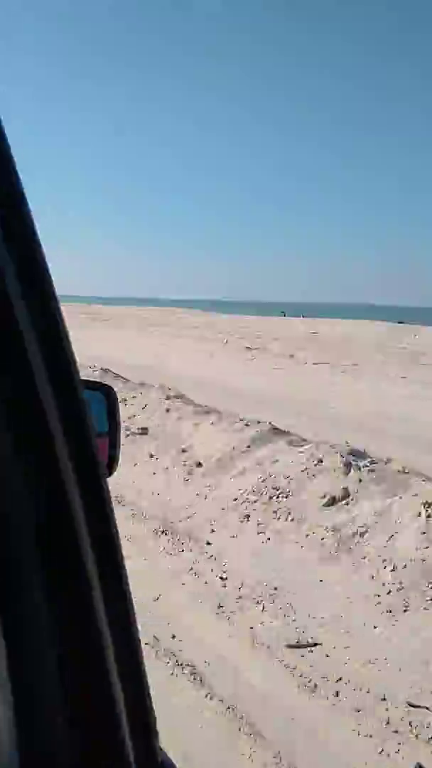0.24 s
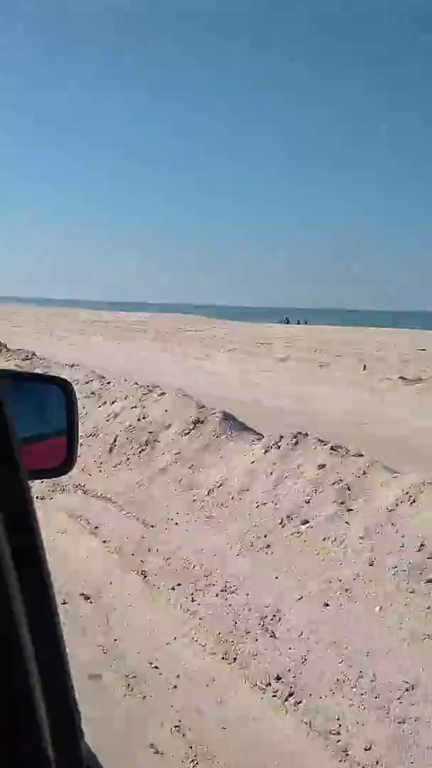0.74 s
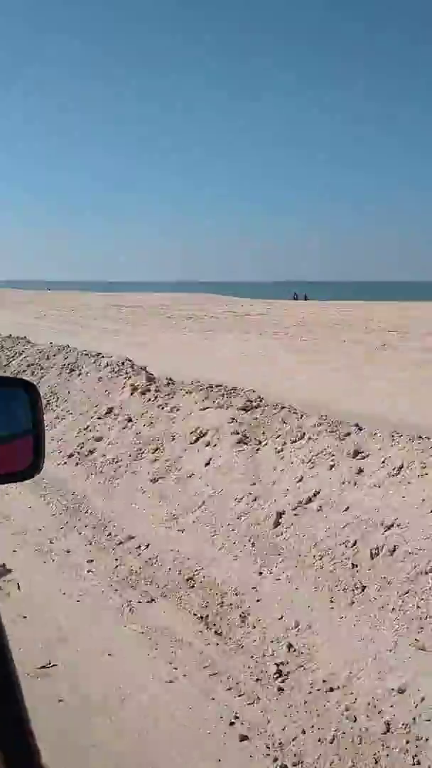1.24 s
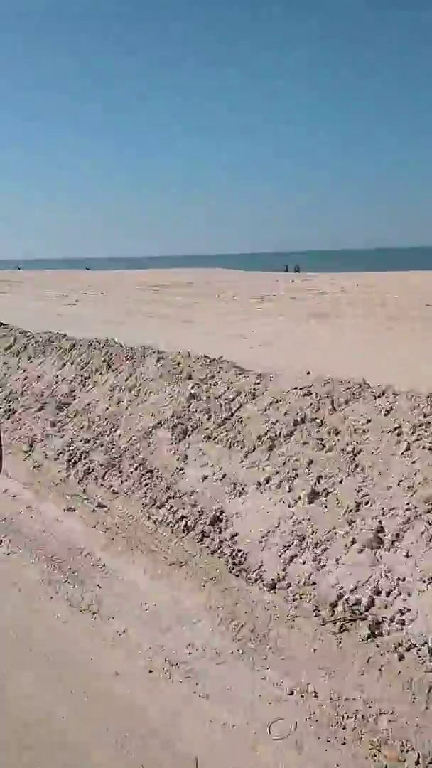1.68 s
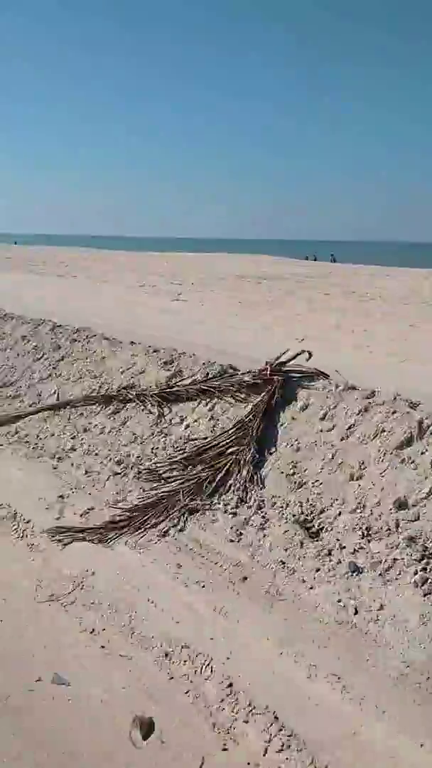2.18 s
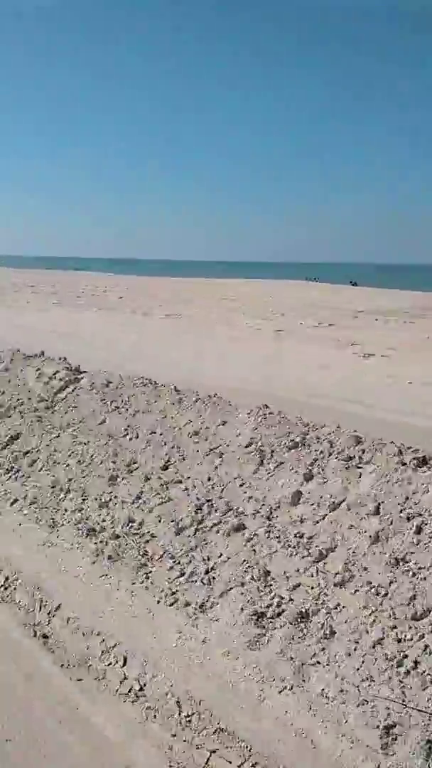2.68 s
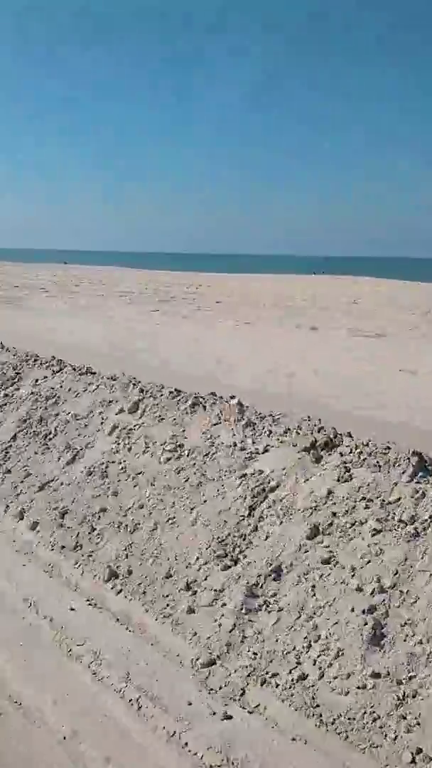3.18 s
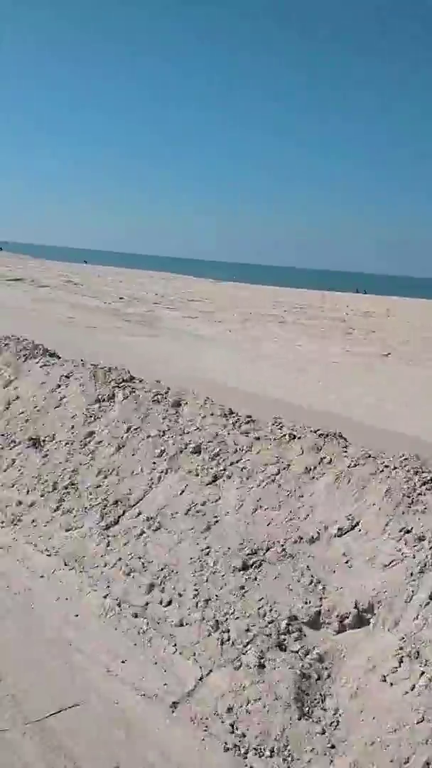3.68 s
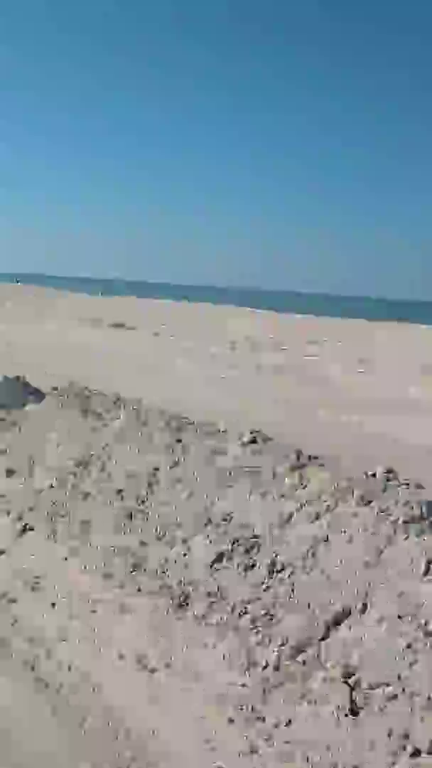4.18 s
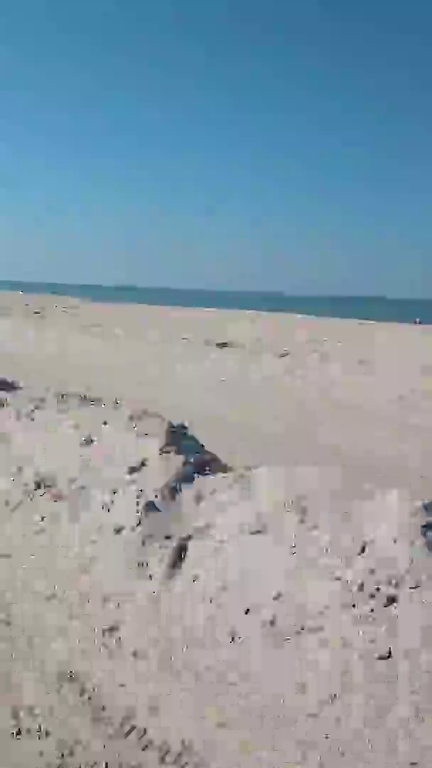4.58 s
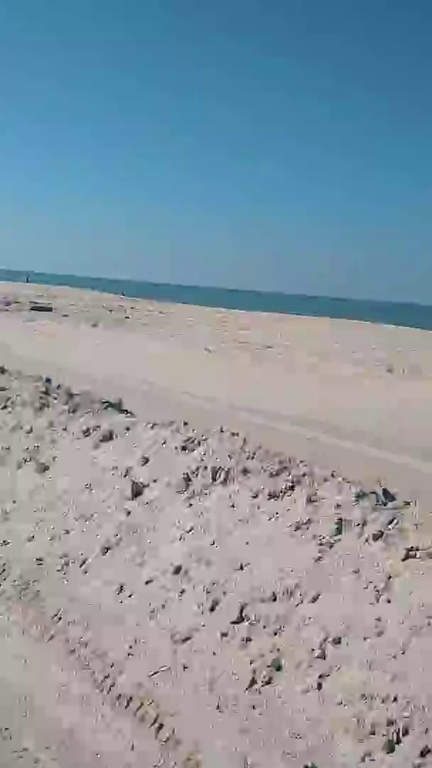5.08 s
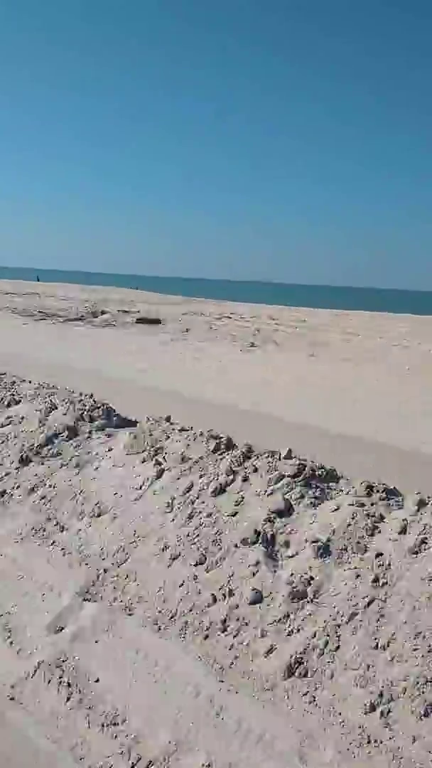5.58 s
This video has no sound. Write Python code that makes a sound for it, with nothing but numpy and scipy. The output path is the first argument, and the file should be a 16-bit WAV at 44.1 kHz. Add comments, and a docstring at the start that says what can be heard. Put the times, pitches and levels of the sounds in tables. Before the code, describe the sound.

Heard from a phone inside a car on a sandy track: low road rumble, a thin hissing rush, dull thumps and spurts of sand. A gust hits at about half a second, the car sound drops away, and by one and a half seconds violent wind batters the microphone, continuing to the end with knocks, short lulls and sharp crackling spikes.

```python
"""A phone with two microphone ports is held at the side window of a car driving along a sandy track.
At first tyres and sand are heard as coloured noise, with dull thumps (brief low tones that swell and
fade evenly) and hissing scuffs. A first gust comes at the edge of the window; then the airstream builds
and eddies batter the ports: noise that follows the flow, with knocks at eddy fronts and sharp spikes.
Each port is subtracted from the other to widen the stereo, so the buffeting is out of phase in the bass."""
import sys
import numpy as np
from scipy import signal
from scipy.fft import rfft, irfft
from scipy.io import wavfile
from scipy.ndimage import uniform_filter1d, minimum_filter1d

SR = 44100
rng = np.random.default_rng(int(sys.argv[2]) if len(sys.argv) > 2 else 0)


def master_out(mix):
    """Clip the mix to full scale and print it as 16-bit PCM to the path in sys.argv[1]."""
    frames = np.transpose(np.atleast_2d(mix))
    ceiling = np.clip(frames, -1, 1)
    pcm = np.round(ceiling * 32767).astype(np.int16)
    wavfile.write(sys.argv[1], SR, pcm)


N = 257544
TIME = np.arange(N) / SR  # s
FREQ = np.maximum(np.arange(N // 2 + 1) * SR / N, 1)  # Hz

# The car falls in level in two steps as the phone moves out: (time [s], length of the step [s])
MOVES = [(.555, 0.034), (1.42, 0.22)]
# Lift of each sound over its colour: inside the window, at its edge, out in the airstream [dB]
RUMBLE_DB, SPRAY_DB = (2, -9, -15.5), (-16.5, -21, -24.5)
RUSH_DB = (1.5, -9, -27)
# Road rumble, nearly alike on both ports: (frequency [Hz], density [dB per Hz])
RUMBLE_COLOUR = [(25, -76), (60, -46), (140, -42), (260, -48.5), (450, -63.5), (700, -65), (950, -74),
                 (1300, -97), (2100, -112), (6000, -135)]
# Rush on the right port, at first of the tyres: (frequency [Hz], density [dB per Hz])
RUSH_COLOUR = [(1200, -105), (1800, -100), (2130, -88.5), (2330, -70.5), (2700, -71), (3300, -80),
               (3900, -89), (5200, -103), (6500, -111), (9000, -122), (15000, -130)]
# Hiss on the right port swells for a while: (time [s], lift [dB], length [s])
HISS_SWELLS = [(1.28, 5, 0.49), (3.0, 15.5, 0.6)]
# The tyres spurt through loose sand while the phone is still inside: (time [s], lift [dB])
SPURTS = [(.088, 12), (.215, 9.5), (.254, 9.5), (.312, 4), (0.327, 7), (.373, -4), (.4, 0), (.434, 4.5),
          (.465, 0), (.498, -2), (.528, 5)]
SPURT_S = 0.0053
# Sand spray: (frequency [Hz], density [dB per Hz])
SAND_COLOUR = [(2500, -120), (4500, -80.5), (5800, -97), (6700, -105), (7350, -92), (8200, -108),
               (10500, -99), (12500, -90.5), (15000, -90.5)]
# The tyres throw up more sand: (time [s], lift [dB], length [s])
SAND_BURSTS = [(.16, 16, 0.27), (0.528, 12, 0.053), (5.84, 18.5, 0.16)]
# Air rushing past the window frame, over its colour: (time [s], level [dB])
FRAME_AIR = [(0, -24), (.14, 1.5), (.25, -27), (.36, -4.5), (.6, -6), (.88, -4), (1.0, 5), (1.12, 4),
             (1.5, -8.5)]
# Colour of the air on the frame: (frequency [Hz], density [dB per Hz])
FRAME_AIR_COLOUR = [(300, -85), (800, -70.5), (1300, -81), (1650, -90.5), (1950, -107), (2500, -86),
                    (5000, -122)]
# Dull thumps as the car rides over ruts: (time [s], peak [dB], pitch [Hz], length [s])
THUMPS = [(.068, -7, 149, 0.0048), (.16, -7.5, 172, 0.01), (.559, -14, 227, 0.012), (1.353, -9, 175, 0.01)]
# Brief hissing scuffs: (time [s], level [dB], length [s], centre [Hz], width [log of frequency ratio])
SCUFFS = [(0.33, -50.5, 0.08, 4260, 0.12), (0.373, -55, 0.062, 1690, 0.12),
          (0.523, -58.5, .034, 7200, 0.58), (.69, -70, .03, 7300, 0.61), (1.0, -53, 0.03, 4600, 0.38),
          (1.195, -62.5, 0.22, 4350, 0.1), (1.36, -68, .012, 6000, 0.71), (1.393, -56, 0.015, 4700, 0.34),
          (1.394, -59, .02, 13000, 0.38)]
SCUFF_GRAIN_DB = 3

# Airstream strength, building as the phone leaves shelter, then swelling and easing: (time [s], level [dB])
FLOW = [(0, -38), (.26, -38), (.35, -32), (.45, -40.5), (.52, -40), (.85, -43.5), (1.0, -32.5), (1.22, -34),
        (1.42, -30), (1.58, -29), (1.76, -25), (1.9, -22.5), (2.03, -23), (2.15, -19.5), (2.55, -19.5),
        (2.95, -19), (3.3, -15), (3.63, -22), (4.4, -21), (4.52, -24), (4.72, -19), (4.92, -24),
        (5.3, -17.5), (5.84, -19)]
CRUISE_DB = -20  # level of cruising flow in that table
# The first gust, as the phone reaches the edge of the window: (time [s], lift [dB], length [s])
FIRST_GUST = (.555, 24, 0.024)
# The largest eddies that hit the phone: (time [s], lift over the airstream [dB], length [s])
BUFFETS = [(1.043, 10.0, 0.01), (1.124, 10.0, 0.05), (1.277, 6.0, 0.041), (1.35, 15.5, 0.01),
           (1.408, 12.0, 0.019), (1.427, 8, 0.007), (1.46, 14, 0.011), (1.526, 14, 0.011),
           (1.54, 13.5, 0.019), (1.603, 10, 0.018), (1.669, 14, 0.027), (1.724, 7.5, 0.022),
           (1.764, 8.0, 0.006), (1.798, 11, 0.012), (1.858, 14, 0.008), (1.876, 8, 0.005),
           (1.894, 12, 0.021), (1.948, 9, 0.006), (1.958, 13, 0.022), (2.103, 5.5, 0.01),
           (2.134, 9.0, 0.009), (2.173, 6.5, 0.006), (2.19, 8.0, 0.013), (2.228, 5.0, 0.01),
           (2.281, 10.5, 0.007), (2.332, 5.0, 0.029), (2.386, 10.5, 0.008), (2.408, 8.5, 0.027),
           (2.484, 7, 0.007), (2.579, 8.5, 0.012), (2.621, 8.5, 0.007), (2.636, 8.5, 0.007),
           (2.699, 11.5, 0.008), (2.718, 7.0, 0.009), (2.775, 7.0, 0.012), (2.824, 10.0, 0.006),
           (2.847, 7.0, 0.008), (2.999, 9.5, 0.008), (3.125, 7.5, 0.009), (3.198, 4.5, 0.016),
           (3.238, 7, 0.006), (3.302, 8.0, 0.007), (3.344, 5.5, 0.009), (3.46, 5.0, 0.049),
           (3.501, 8.0, 0.013), (3.559, 7.0, 0.026), (3.688, 8.5, 0.005), (3.769, 9.0, 0.033),
           (3.805, 7.0, 0.009), (3.902, 7.5, 0.006), (3.913, 5.0, 0.038), (3.953, 6.5, 0.034),
           (4.01, 9, 0.007), (4.047, 10, 0.009), (4.102, 8.0, 0.013), (4.146, 6.5, 0.046),
           (4.183, 9, 0.008), (4.206, 7, 0.007), (4.354, 6.0, 0.033), (4.411, 7.5, 0.017),
           (4.453, 9.0, 0.019), (4.504, 8.0, 0.006), (4.531, 7, 0.007), (4.573, 9, 0.006),
           (4.701, 6.5, 0.007), (4.734, 10.5, 0.01), (4.755, 7.5, 0.006), (4.834, 7.5, 0.032),
           (4.969, 11.5, 0.009), (4.991, 8.0, 0.006), (5.105, 4.5, 0.024), (5.124, 6.5, 0.009),
           (5.227, 5.0, 0.019), (5.252, 6.5, 0.011), (5.358, 5.5, 0.015), (5.372, 10.5, 0.009),
           (5.409, 8.5, 0.008), (5.467, 6.5, 0.015), (5.526, 8.0, 0.006), (5.569, 7.5, 0.013),
           (5.618, 9, 0.018), (5.673, 8.5, 0.007), (5.707, 6.0, 0.016), (5.737, 10, 0.007),
           (5.767, 7.0, 0.02)]
EDDY_RISE_S = 0.0014
STRONGEST_EDDY_DB = 8.5  # soft ceiling of the flow over cruising
# Brief lulls as the stream lifts off the ports: (time [s], change [dB], length [s])
LULLS = [(1.492, -8, 0.01), (1.514, -7, 0.0067), (1.58, -20, 0.024), (1.714, -7.5, 0.008),
         (1.927, -10.5, 0.016), (3.893, -5, 0.0079), (4.197, -18, 0.012), (4.255, -13, 0.011),
         (5.141, -8.5, 0.006)]
STRAY_EDDIES_PER_S, STRAY_FALL_S, STRAY_DB = 170, 0.0036, 1.49  # the lesser eddies between the large
FLUTTER_HZ, FLUTTER_DB = 67.6, 1.5
# Wind pressure at cruising flow, before the exposure of each port: (frequency [Hz], density [dB per Hz])
WIND_COLOUR = [(25, -65.5), (42, -76), (75, -48), (115, -38), (160, -37.5), (250, -42.5), (450, -50),
               (800, -59), (1400, -73), (2200, -85.5), (3200, -98.5), (4500, -105), (7000, -122),
               (15000, -138)]
# How bands follow the flow: (frequency [Hz], follow [dB per dB of flow],
# depth of fine turbulence [dB], rise on a pressure crest [dB])
RESPONSE = [(81, 0.88, 1.5, 0), (228, 0.92, 0.46, 0.5), (710, 0.91, 4, 1.16), (1570, 0.9, 4, 3.5),
            (2950, 0.85, 5, 3.5), (7000, 0.46, 3, 0.5)]
DULL_ABOVE_HZ, DULL_PER_OCTAVE = 1200, 0.81  # slow eddies lose treble: dB per octave per dB under cruising
# Which port faces the stream as the phone turns in the hand: (time [s], left over right [dB])
FACING = [(0, 0.5), (1.25, -5), (1.5, 14.5), (2.35, 6.5), (2.88, -14), (3.15, -4.5), (3.35, 4.5), (5.84, 3)]
FACING_GROWS = 0.021  # a large eddy is more one-sided: share per dB of its lift
PORTS_DB = 0.42  # gain of the turbulence on both ports
# Slow swirl behind the window frame, over its colour; the last level holds: (time [s], level [dB])
SWIRL = [(0, -7), (.12, -1), (.25, -17), (.4, -2), (.65, -23), (.95, -14), (1.14, 0.5), (1.25, 5.5),
         (1.4, 11.5), (1.85, 2.5)]
# Colour of the slow swirl: (frequency [Hz], density [dB per Hz])
SWIRL_COLOUR = [(25, -63.5), (42, -67.5), (70, -49.5), (140, -47), (230, -53.5), (400, -67), (800, -88.5),
                (2000, -130)]
SWIRL_FOLLOW = 0.49  # dB of slow swirl per dB of a large eddy
# Pressure spikes as a vortex breaks on the left port, before gain and colour: (time [s], level [dB])
SPIKES = [(1.4627, -48.5), (1.67, -40), (1.6808, -34.5), (1.859, -48), (1.959, -53), (1.9709, -34.5),
          (1.9875, -45), (2.157, -62), (2.175, -45.5), (2.346, -42.5), (2.361, -49), (2.4302, -34),
          (2.696, -51), (2.717, -42), (3.0595, -43), (3.214, -38), (3.264, -41.5), (3.3021, -35),
          (3.329, -42), (3.3423, -33.5), (3.351, -38), (3.3678, -41.5), (3.3862, -41.5), (3.461, -42.5),
          (3.5791, -39.5), (3.688, -43), (3.9618, -44), (4.4138, -35), (4.42, -40), (4.4622, -41.5),
          (4.496, -42.5), (4.5753, -41.5), (4.734, -40), (4.851, -40), (5.126, -42), (5.3644, -50),
          (5.376, -35.5), (5.467, -30.5), (5.54, -39), (5.6196, -33), (5.6266, -45), (5.7678, -42.5)]
# Colour of a spike: (frequency [Hz], gain [dB])
SPIKE_COLOUR = [(40, 29.5), (150, 38), (600, 50.5), (1400, 46.5), (2500, 33.5), (4000, 23.5), (7000, 1),
                (15000, -15)]
# Knock of a steep eddy front on a port, at cruising flow: (frequency [Hz], gain [dB])
KNOCK_COLOUR = [(40, -7), (130, 16.5), (500, 11), (1200, 3.5), (1800, -10), (2600, -21), (4000, -37.5),
                (8000, -56.5)]
KNOCK_LATE_S, KNOCK_FOLLOW = 0.001983, 0.55  # delay after the front arrives; dB per dB of flow
KNOCK_PER_LIFT, USUAL_LIFT_DB = 0.28, 11  # an eddy that stands out has a steeper front: dB per dB of lift

OVERLOAD_DB = 0  # pressure at which the microphones flatten out
WIDEN_SHARE, WIDEN_LAG_S = 0.77, 0.000459
TOP_HZ = 15600


def undb(db):
    """Logarithmic level: decibels become an amplitude ratio."""
    return 10 ** (np.asarray(db) / 20)


def curves(table):
    """Linear interpolation: each column of a timed table, joined by straight lines."""
    s, *columns = np.transpose(table)
    return [np.interp(TIME, s, c) for c in columns]


def white():
    """White noise: equal power in every band, one unit per Hz."""
    return rng.standard_normal(N) * np.sqrt(SR / 2)


def colour(x, points):
    """Minimum-phase filtering: a causal response with its gain through (Hz, dB) points."""
    hz, db = np.transpose(points)
    log_gain = np.log(undb(np.interp(np.log(FREQ), np.log(hz), db)))
    # folding the cepstrum onto positive time makes the response causal
    cepstrum = irfft(log_gain, N)
    cepstrum[1:N // 2] *= 2
    cepstrum[N // 2 + 1:] = 0
    response = irfft(np.exp(rfft(cepstrum)), N)[:SR // 10]
    return signal.fftconvolve(x, response)[:N]


def delay(x, lag_s):
    """Pure delay: both channels start later by a whole number of samples."""
    return np.pad(x, ((0, 0), (round(lag_s * SR), 0)))[:, :N]


def walk(rate_hz):
    """Low-passed random fluctuation: spread 1, moving up to about the given rate."""
    spectrum = rfft(rng.standard_normal(N)) * np.exp(-(FREQ / rate_hz) ** 2)
    x = irfft(spectrum, N)
    return x / x.std()


def swell(s, length):
    """Gaussian envelope: a bell-shaped rise and fall around one moment."""
    return np.exp(-2 * ((TIME - s) / length) ** 2)


def lifts(table):
    """Superposition of Gaussian envelopes: lift in dB from a table of swells."""
    return sum(lift_db * swell(s, length) for s, lift_db, length in table)


def sheltered(inside_db, edge_db, outside_db):
    """Shelter of the window: level in dB as the phone moves from inside to its edge and then out."""
    to_edge, to_outside = (np.clip((TIME - s) / length + .5, 0, 1) for s, length in MOVES)
    return inside_db + (edge_db - inside_db) * to_edge + (outside_db - edge_db) * to_outside


def road():
    """Modulated broadband noise: road rumble, air on the frame, a grainy rush and sand spray."""
    rumble_db = sheltered(*RUMBLE_DB)
    rumble = colour(white() * undb(rumble_db + 2 * walk(6.5)), RUMBLE_COLOUR)

    air_db = curves(FRAME_AIR)[0]
    air = colour(white() * undb(air_db + 1.3 * walk(30)), FRAME_AIR_COLOUR)

    spurts_db = lifts((s, db, SPURT_S) for s, db in SPURTS)
    rush_db = sheltered(*RUSH_DB) + lifts(HISS_SWELLS) + spurts_db
    rush = colour(white() * undb(rush_db + 1.6 * walk(50) + 1.4 * walk(400)), RUSH_COLOUR)

    spray_db = sheltered(*SPRAY_DB) + lifts(SAND_BURSTS)
    # independent noise on each port
    left_spray, right_spray = (colour(white() * undb(spray_db + walk(200)), SAND_COLOUR) for _ in range(2))

    left = rumble + air + left_spray
    right = undb(-0.5) * (rumble + air) + rush + undb(-4.5) * right_spray
    return np.array([left, right])


def thumps():
    """Gaussian tone bursts: brief low tones that swell and fade evenly, the same on both ports."""
    return sum(undb(db) * swell(s, length) * np.sin(2 * np.pi * hz * (TIME - s))
               for s, db, hz, length in THUMPS)


def scuffs():
    """Band-limited noise: short grainy hisses, each with its own brightness."""
    out = 0
    for s, db, length, hz, width in SCUFFS:
        band = np.exp(-(np.log(FREQ / hz) / width) ** 2)
        hiss = irfft(rfft(rng.standard_normal((2, N))) * band, N)
        out = out + hiss / hiss.std() * undb(db) * swell(s, length)
    return out * undb(SCUFF_GRAIN_DB * walk(250))


def slap(s, length, rise_s):
    """Transient envelope: the steep front of an eddy, a short hold and a quick fall."""
    age = TIME - s
    spent = np.clip(age / length, 0, 2)
    front = np.clip(age / rise_s + 1, 0, 1)
    return front * np.exp(-spent * spent * spent) * (spent < 2)


def buffets():
    """Large-scale turbulence: lift in dB from the first gust and the large eddies."""
    return sum(lift_db * slap(s, length, EDDY_RISE_S) for s, lift_db, length in [FIRST_GUST, *BUFFETS])


def small_eddies(rate, fall_s):
    """Shot noise: random impacts of very unequal strength, dying away; mean 0, spread 1."""
    impacts = (rng.random(N) < rate / SR) * rng.exponential(size=N)
    decaying = signal.lfilter([1], [1, -np.exp(-1 / (fall_s * SR))], impacts)
    x = uniform_filter1d(decaying, size=24)
    return (x - x.mean()) / x.std()


def airstream(buffet_db):
    """Turbulent flow in dB over cruising: steady stream, large and lesser eddies, lulls and flutter."""
    stray = np.tanh(small_eddies(STRAY_EDDIES_PER_S, STRAY_FALL_S))
    stray = stray - uniform_filter1d(stray, size=2200)  # removes the slow drift
    stray_db = STRAY_DB * stray / stray.std()
    steady_db = curves(FLOW)[0] - CRUISE_DB
    flow_db = steady_db + buffet_db + lifts(LULLS) + stray_db + FLUTTER_DB * walk(FLUTTER_HZ)
    # no eddy is much faster than the stream that drives it
    return flow_db - 2 * np.logaddexp(0, (flow_db - STRONGEST_EDDY_DB) / 2)


def port(flow_db):
    """Turbulent pressure on a port: faster flow is brighter; small eddies crackle on large crests."""
    hz, follow, depth_db, crest_db = np.transpose(RESPONSE)
    noise = rfft(white())
    bursts = 2.86 * np.tanh(small_eddies(rate=500, fall_s=0.0012) / 2.0)
    swing = colour(irfft(noise, N), WIND_COLOUR)
    crests = 2 * np.tanh(np.maximum(swing / swing.std(), 0) ** 2 / 2)
    # how far the flow lies under cruising
    slack_db = np.minimum(curves(FLOW)[0] - CRUISE_DB + buffets() / 2, 0)
    dull = DULL_PER_OCTAVE * np.maximum(np.log2(hz / DULL_ABOVE_HZ), 0)
    pressure = 0
    for k, pick in enumerate(np.eye(len(hz))):
        # overlapping bands that cross-fade along log frequency
        band = irfft(noise * np.interp(np.log(FREQ), np.log(hz), pick), N)
        band = band * undb(depth_db[k] * bursts + crest_db[k] * crests)
        # the bursts share the power that the stream supplies, so it evens out over a few cycles
        power = uniform_filter1d(colour(band, WIND_COLOUR) ** 2, int(SR * (0.015 + 7 / hz[k])))
        even = band * np.sqrt(power.mean() / power)
        pressure = pressure + even * undb(follow[k] * flow_db + dull[k] * slack_db)
    return colour(pressure, WIND_COLOUR)


def spikes(gain_db, ragged, lead_s, tail_s):
    """Impulsive pressure: each breaking vortex is one steep pulse inside a short ragged burst."""
    kicks = np.zeros(N)
    size = SR // 50
    age = np.arange(-size, size) / SR
    envelope = np.exp(np.minimum(age / lead_s, -age / tail_s))
    for s, db in SPIKES:
        pulse = ragged * rng.standard_normal(len(age)) * envelope
        pulse[size] += 1
        start = int(s * SR) - size
        kicks[start:start + len(age)] += undb(db + gain_db) * pulse[:N - start]
    return colour(kicks, SPIKE_COLOUR)


def knocks(flow_db, facing_db):
    """Impulse response of a port: each eddy front pushes or pulls the windward one, harder in fast flow."""
    kicks = np.zeros((2, N))
    pulls = rng.integers(2, size=len(BUFFETS))
    for (s, lift_db, _), pull in zip(BUFFETS, pulls):
        at = int((s + KNOCK_LATE_S) * SR)
        windward = int(facing_db[at] < 0)  # 0 left, 1 right
        knock_db = KNOCK_FOLLOW * flow_db[at] + KNOCK_PER_LIFT * (lift_db - USUAL_LIFT_DB)
        kicks[windward, at] = (-1) ** pull * undb(knock_db)
    return np.array([colour(k, KNOCK_COLOUR) for k in kicks])


def wind():
    """Partial coherence: ports share large eddies, not small; windward is louder, left adds swirl and spikes."""
    buffet_db = buffets()
    flow_db = airstream(buffet_db)
    facing_db = curves(FACING)[0] * (1 + FACING_GROWS * buffet_db)
    # the two exposures split a fixed power
    exposure = undb(PORTS_DB) / np.hypot(1, undb([-facing_db, facing_db]))
    swirl_db = curves(SWIRL)[0] + SWIRL_FOLLOW * buffet_db
    swirl = colour(white() * undb(swirl_db + 0.87 * walk(6.3)), SWIRL_COLOUR)
    left = port(flow_db) * exposure[0] + swirl
    left = left + spikes(gain_db=2.5, ragged=0.058, lead_s=0.0013, tail_s=0.0056)
    right = port(flow_db) * exposure[1]
    return np.array([left, right]) + knocks(flow_db, facing_db)


def scene():
    """Superposition: wind on the ports over the sound of the car."""
    return wind() + road() + thumps() + scuffs()


def widen(ports):
    """Comb filtering: each port less the other delayed, which hollows common sound at 2.2 kHz multiples."""
    return ports - WIDEN_SHARE * delay(ports[::-1], WIDEN_LAG_S)


def record(dry):
    """Saturation, then stereo widening, peak limiting below full scale and a steep low-pass."""
    rounded = dry / (1 + (dry / undb(OVERLOAD_DB)) ** 4) ** (1 / 4)
    wide = widen(rounded)
    headroom = 1 / np.maximum(np.abs(wide).max(axis=0), 1)
    # hold the lowest gain around each peak, then smooth it twice
    held = minimum_filter1d(headroom, size=111)
    gain = uniform_filter1d(uniform_filter1d(held, size=55), size=55)
    low_pass = signal.ellip(10, .2, 80, TOP_HZ, fs=SR, output="sos")
    return signal.sosfilt(low_pass, wide * gain)


dry = scene()
out = record(dry)
master_out(out)
```